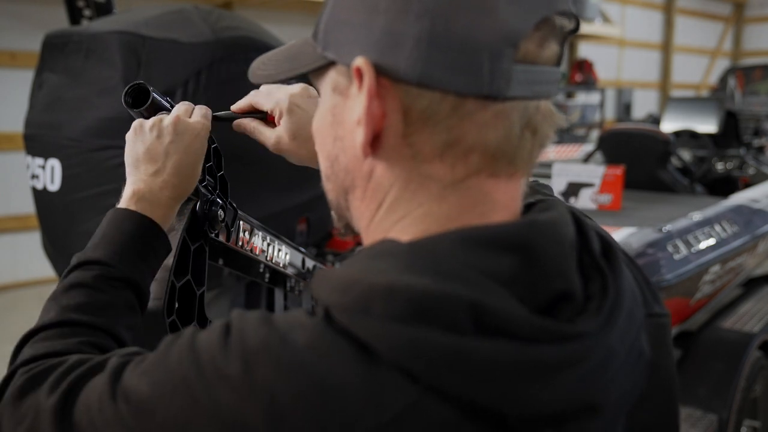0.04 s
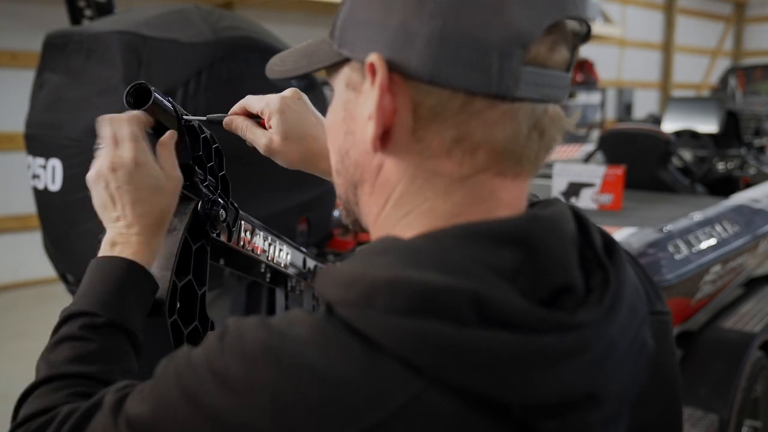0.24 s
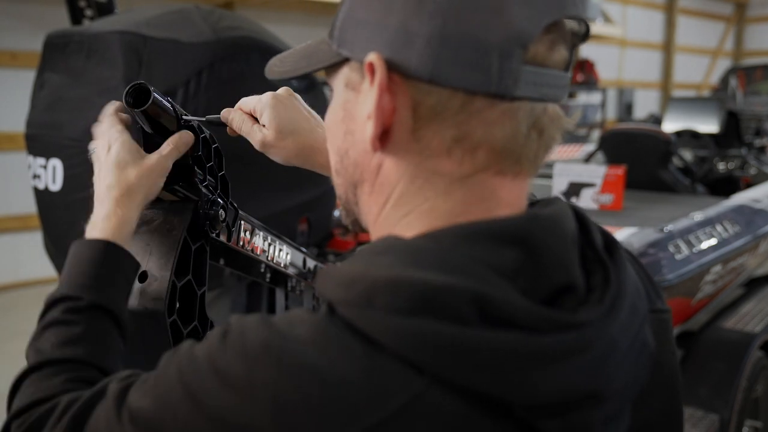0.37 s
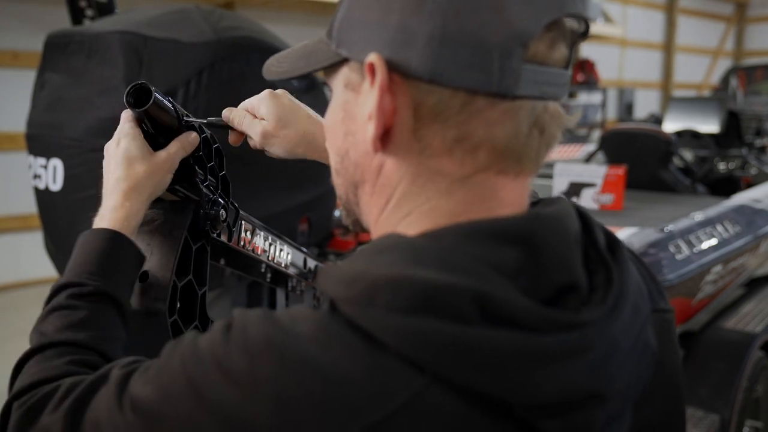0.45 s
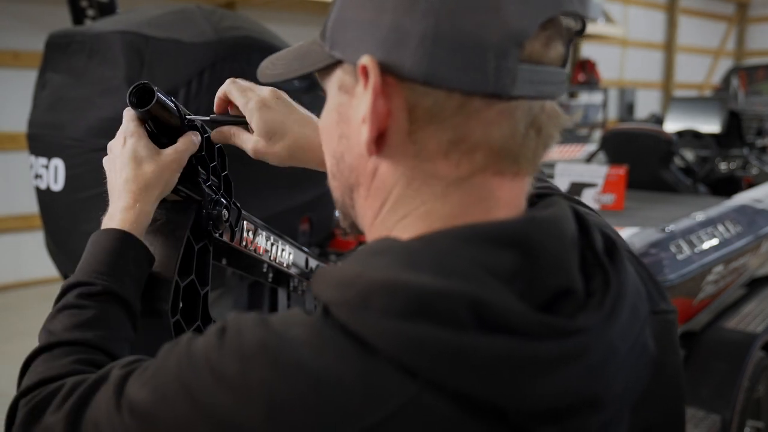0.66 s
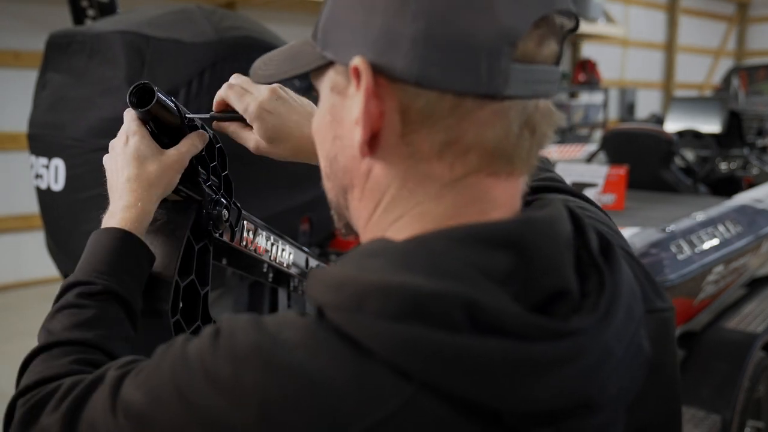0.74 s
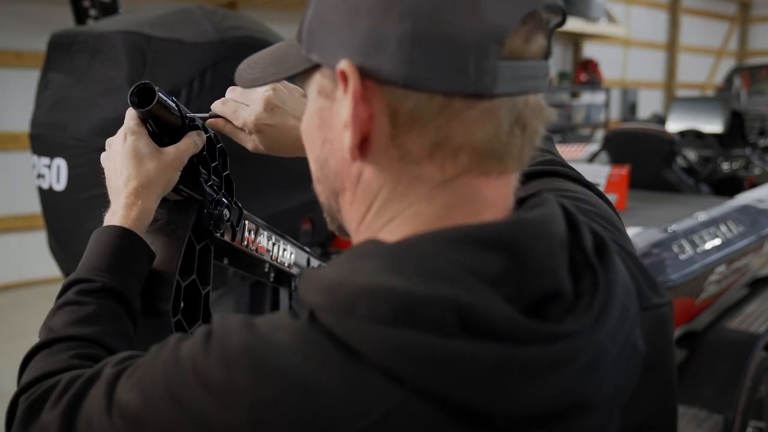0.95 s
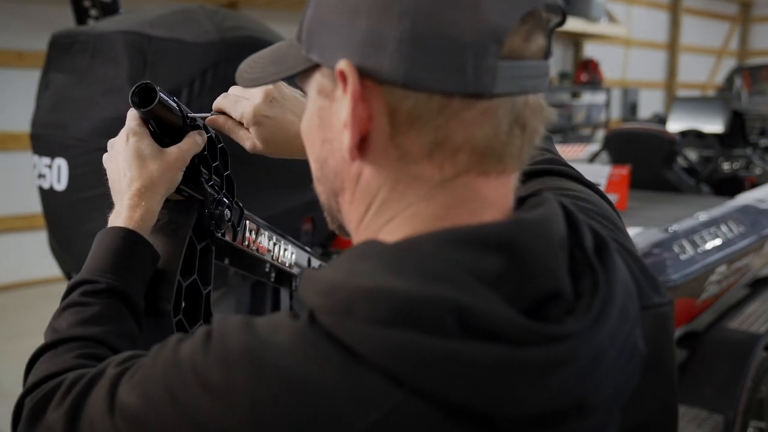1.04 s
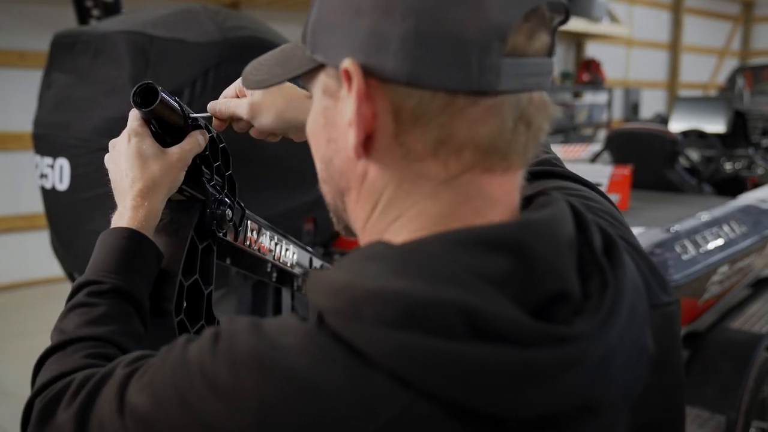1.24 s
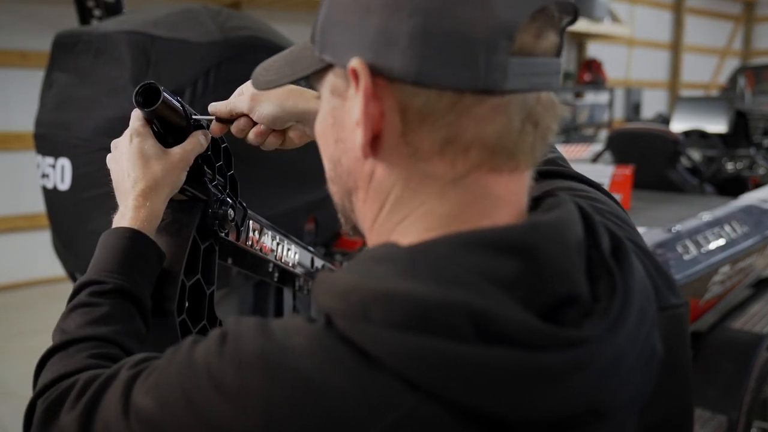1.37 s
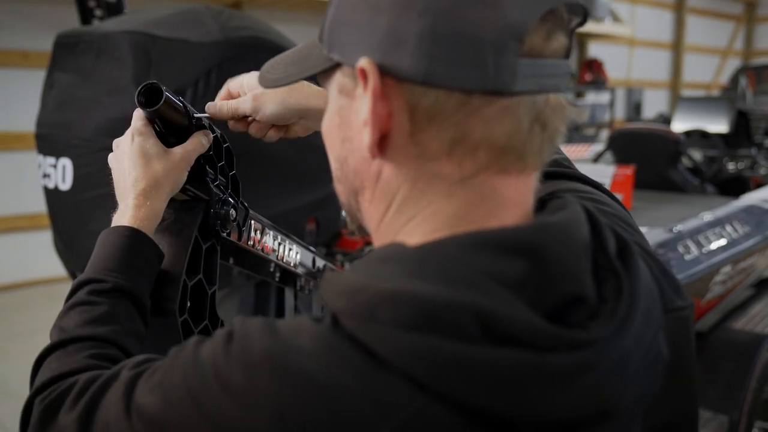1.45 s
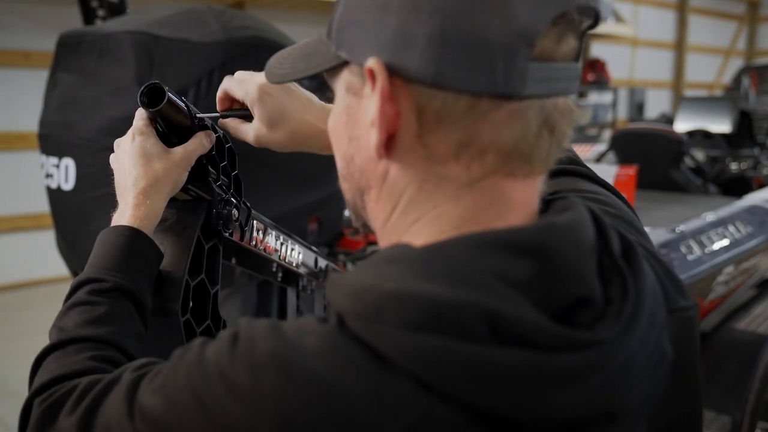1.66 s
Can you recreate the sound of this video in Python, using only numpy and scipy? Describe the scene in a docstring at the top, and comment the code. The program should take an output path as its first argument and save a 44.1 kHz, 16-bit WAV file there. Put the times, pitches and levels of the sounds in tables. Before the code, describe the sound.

A hand screwdriver clicks and slips on a small screw in a hollow tube, in a workshop

```python
"""Screwdriver on a hollow tube

A hand screwdriver works a small screw into a mount clamped on a hollow tube, in a big hard-walled workshop.
Knocks swell hollow sines, ring the upper tube modes and thud the frame; rubbing stirs further notes.
The steel tip ticks on the screw head by micro-touches and slips once in a short rattle of dense grains.
Decaying noise gives the hall's long faint tail; band-shaped noise gives a steady low rumble and hiss.
"""
import sys
import numpy as np
from scipy import signal
from scipy.io import wavfile

SR = 44100
rng = np.random.default_rng(int(sys.argv[2]) if len(sys.argv) > 2 else 0)


def linear_from_db(decibels):
    """Turn decibels (scalar or array-like) into linear amplitude factors; 0 gives 1."""
    return 10 ** (np.asarray(decibels, float) / 20)


def generate_wav(sig):
    """Save sig (samples, or channels by samples) to the path in sys.argv[1] as 16-bit PCM at SR."""
    pcm = np.round(np.clip(np.atleast_2d(sig).T, -1, 1) * 32767).astype(np.int16)
    wavfile.write(sys.argv[1], SR, pcm)


N = 74970

# workshop air, relative noise density: f/Hz, level/dB
AIR_SPECTRUM = [(13, -41), (22, -15.5), (80, 5), (200, -8.5), (256, -11.5), (387, -9), (420, -10),
                (602, -11.5), (710, -13), (1070, -14), (1410, -17), (2740, -30), (8490, -27.5),
                (12100, -30), (13900, -30.5), (16000, -43)]
AIR_RMS_DB = -61.5

# knocks on the tube, relative levels: t/s, level/dB, hollow f/Hz, second-note level/dB, upper-mode level/dB
TUBE_KNOCKS = [(.066, -32.5, 717, -34, -20), (.075, -25.5, 712, -9.5, -22.5),
               (.080, -34, 706.6, -2.5, -15.5), (.114, -41, 754, -7, -16.5), (.119, -40.5, 684, -15, -28),
               (.177, -32.5, 712, -19, -38), (.199, -35, 755, -10, -18), (.208, -23, 712, -10, -12),
               (.214, -21.5, 712, -6, -13), (.219, -24, 692, -7, -32), (.226, -26.5, 712, -6, -8.5),
               (.233, -36, 680, -5, -1.5), (.242, -42, 712, -18, -9.5), (.2515, -18.5, 740, -1, -6.5),
               (.256, -25, 712, -5.5, -10), (.262, -29, 712, -3, -8), (.269, -23, 703, -10, -8),
               (.275, -25.5, 742, 1.5, -4.5), (.280, -28.5, 780, 1, -9), (.287, -40.5, 790, -5, -7),
               (.339, -61, 780, 0, -0.5), (.416, -45.5, 780, -3, -17), (.422, -36.5, 766, -3.5, -17),
               (.430, -41.5, 722, -8, -18), (.451, -32.5, 694, -14, -11), (.455, -26.5, 718, -6, -13),
               (.460, -32.5, 747.2, -0.5, -15), (.467, -42, 673, -4.5, -2), (.482, -35.5, 654, -5.5, -15.5),
               (.489, -46, 715, -15, -15), (.502, -35, 693, -28, -21), (.522, -47.5, 706, -11, -13),
               (.558, -45, 802, -11, -0.5), (.562, -36, 654, -6, -11.5), (.583, -38.5, 643, -10, -15),
               (.622, -42, 715, -12, -17), (.656, -45.5, 690, -13, -13), (.668, -35, 780, -3.5, -7),
               (.673, -24, 698, -4.5, -13.5), (.682, -27.5, 670.6, -13, -16.5), (.687, -42, 687, -11, -8.5),
               (.710, -43, 674, -9, -15), (.717, -47.5, 706, -20, -25), (.742, -39, 718, -19, -32),
               (.757, -41, 681, -21.5, -31), (.809, -49, 734, -21.5, -30), (.822, -49.5, 690, -12, -22.5),
               (.886, -48, 692, -5, -9.5), (.907, -51.5, 680, 3.5, -8), (.941, -54.5, 773, 1.5, -2.5),
               (1.029, -49.5, 1240, -21, -16.5), (1.051, -40.5, 635, 0, -0.5),
               (1.058, -44.5, 611, -5, -7.5), (1.088, -49.5, 728, -16.5, -14),
               (1.275, -39.5, 684, -26, -12), (1.333, -49, 684, -16, -8.5), (1.375, -51, 707, -14, -13),
               (1.395, -52, 685, -4.5, -3.5), (1.409, -42, 657, -16, -10.5), (1.429, -37, 667, -14, -9.5),
               (1.449, -52.5, 787, -10, -7), (1.526, -56, 726, -20, -5), (1.575, -43.5, 647, -2, -7.5),
               (1.599, -51.5, 785, -17, -11), (1.618, -51, 675, -15, -14), (1.647, -51, 644, -23, -20.5)]
# upper tube modes: f/Hz, relative level/dB, t60/s
TUBE_UPPER_MODES = [(1124, 4.5, 0.01), (1421, 2.56, 0.021), (1642, -5.5, 0.023), (1925, 0.5, 0.015),
                    (2250, -4.5, 0.019), (2565, -10, 0.022), (3310, -8.0, 0.0064)]
# hollow notes stirred by rubbing: f/Hz, relative level/dB, t60/s
RUBBED_NOTES = [(657, 0, 0.057), (712, -4, .05), (780, -4.5, 0.12), (830, -5.5, 0.032), (830, -9.5, 0.019),
                (909, -2, 0.11)]
# handling, fingers and tool keep the tube faintly ringing: t/s, relative level/dB
HANDLING_LEVEL = [(0.0, -53.5), (0.126, -74), (0.278, -27.5), (0.358, -90), (0.62, -53.5), (0.814, -77),
                  (1.07, -63), (1.372, -71), (1.528, -66), (1.7, -60.5)]
# frame that holds the tube, dull thud: f/Hz, level/dB, t60/s
FRAME_MODES = [(167, -61, .15), (370.4, -59.5, 0.11)]
TUBE_CUT_HZ = 500  # the tube radiates little below its lowest note
SECOND_NOTE_HZ = 897
SWELL_S, LEAD_S = 0.0035, 0.00246  # onset to knock peak; contact ahead of the listed time
PUSH_S = 0.0041  # push on the frame, peaks at a third of this
KNOCK_CHATTER_S = 0.0015  # mean delay of a touch
LOW_DB, HIGH_DB, RUB_DB = -4, -9, -4.5
RUBS_PER_NOTE_PER_S, RUB_SPREAD_DB = 25, 0.73

# ticks of the tip on the screw: t/s, relative level/dB, brightest f/Hz, length/s, reach around it/octaves
TIP_TICKS = [(0.072, -47, 5700, 0.0025, 0.56), (0.132, -50, 9500, .0014, 0.4),
             (.148, -56.5, 9500, 0.0022, .4), (0.205, -29.5, 7500, 0.0018, 0.71),
             (.2105, -9, 11200, 0.0016, 0.3), (0.214, -7.5, 11000, 0.00038, 0.51),
             (0.2148, -7.5, 9700, 0.00061, 0.38), (0.2168, -24, 7950, 0.0013, .6),
             (0.2216, -8.5, 6600, 0.00082, 0.52), (0.2231, -12, 9600, 0.00043, 0.42),
             (0.231, -21.5, 6500, 0.0022, 0.38), (0.236, -21, 7260, 0.0026, 0.2),
             (0.252, -11, 8500, .0017, 0.75), (0.257, -25, 8100, 0.0006, .5),
             (0.259, -7.5, 8000, .0008, 0.47), (0.2628, -11, 9600, .0005, 0.34),
             (.266, -13, 11000, .0008, .5), (0.2673, -13, 8500, .0008, .5), (.272, -9, 8960, 0.00043, 0.49),
             (.453, -33, 8900, .002, 0.91), (.455, -28.5, 6950, .0015, 0.5), (0.476, -42, 8260, 0.0016, .4),
             (.4985, -40, 9500, 0.0017, 0.73), (0.56, -44, 4750, .002, 1), (0.581, -43, 5800, 0.0022, .4),
             (0.6, -53, 7000, .002, 0.42), (0.67, -33.5, 7200, 0.0041, 0.74),
             (0.673, -33, 7400, 0.0018, 0.67), (.677, -38.5, 4900, 0.0016, 0.4),
             (0.761, -51, 6000, 0.0021, 0.35), (.8834, -55.5, 5500, 0.00094, .6),
             (.902, -45, 7260, 0.0041, 0.14), (1.051, -41, 7350, 0.0023, 0.43),
             (1.089, -51, 8000, .002, 0.53), (1.273, -49.5, 4800, 0.0011, 0.74),
             (1.394, -39, 9000, 0.0023, 1), (1.419, -38, 7400, .005, 0.18),
             (1.4275, -38, 7320, 0.0014, 0.67), (1.5745, -47, 7340, .001, 0.39),
             (1.5882, -38.5, 11000, 0.0014, 0.68), (1.64, -52, 10000, .0006, .6)]
# modes of tip and screw: f/Hz, relative level/dB, t60 for ticks/s
STEEL_MODES = [(3160, -7.5, 0.00803), (4385, -27, 0.32), (4390, -7.5, 0.0043), (4900, -10.5, 0.0081),
               (5790, -6.5, 0.0048), (6600, -12, .009), (7320, -3.6, 0.005), (8500, -5, 0.0031),
               (9060, -10, 0.0043), (10130, -4, 0.0027), (11670, -16, .006), (13280, -8.5, 0.0028),
               (14300, -10, 0.0019), (15800, -9, 0.0026)]
# scraping tip in the slip: t/s, relative level/dB
SLIP_LEVEL = [(.2045, -49), (.207, -41), (.212, -31.5), (.222, -28.5), (.229, -43.5), (.234, -41),
              (.240, -26.5), (.247, -31), (.252, -36.5), (.260, -28.5), (.270, -40), (.276, -33.5),
              (.284, -52.5), (.295, -76)]
# gain in the slip of the modes above SLIP_TOP_HZ: t/s, level/dB
SLIP_TOP_LEVEL = [(.20, 3), (.228, 2.5), (.234, -9), (.246, -15), (.252, 0), (.29, -3)]
SLIP_TOP_HZ = 9000
TICK_DB, TOUCH_FADE_NEPERS_PER_LENGTH = -11.5, 0.43
SLIP_DB, SLIP_T60_RATIO = -5, 0.7
SLIP_GRAINS_PER_MODE_PER_S, GRAIN_SPREAD_DB = 1625, 3.5

# hall decay: f/Hz, t60/s
HALL_DECAY = [(200, 1.2), (800, 0.7), (2000, 0.46), (4500, 0.85), (9000, 0.47), (16000, 0.9)]
# hall colour: f/Hz, relative level/dB
HALL_TONE = [(200, 6.8), (260, -1.5), (430, 9), (800, -6.6), (1300, 5.5), (2500, -1), (3500, -0.5),
             (4400, -4), (6000, -21), (7500, -11), (10000, -15.5), (16000, -17)]
HALL_DB, HALL_GAP_S = -0.5, 0.005


def rms_one(x):
    """Scale to rms 1."""
    return x / np.sqrt(np.mean(x ** 2) + 1e-20)


def curve(rows, outside_db=None):
    """Level curve to gain per sample."""
    t_s, level_db = np.transpose(rows)
    return linear_from_db(np.interp(np.arange(N) / SR, t_s, level_db, left=outside_db, right=outside_db))


def at_hz(rows, hz):
    """Read a table on a log-frequency axis."""
    table_hz, values = np.transpose(rows)
    return np.interp(np.log(hz), np.log(table_hz), values)


def ring(clicks, hz, t60_s):
    """Two-pole resonator: a unit click starts a decaying sine of height 1."""
    r = linear_from_db(-60 / (t60_s * SR))
    w = 2 * np.pi * hz / SR
    return signal.lfilter([0, np.sin(w)], [1, -2 * r * np.cos(w), r * r], clicks + 1e-18)


def train(t_s, sizes):
    """Clicks of given sizes at given times."""
    return np.bincount((np.ravel(t_s) * SR).astype(int), np.ravel(sizes), N + SR)[:N]


def grains(per_s, spread_db):
    """Random clicks of uneven size and sign."""
    hits = rng.random(N) < per_s / SR
    sizes = linear_from_db(spread_db * np.minimum(rng.exponential(1, N), 4))
    return hits * sizes * rng.choice([-1, 1], N)


def shares(shape):
    """Random signed strengths of the touches of each blow, rms 1 per blow."""
    v = rng.normal(0, 1, shape)
    return v / np.sqrt(np.mean(v ** 2, axis=1, keepdims=True))


def bands():
    """Third-octave band filters with their centres."""
    edges_hz = 20 * 2 ** (np.arange(30) / 3)
    return [(np.sqrt(lo * hi), signal.butter(2, [lo, hi], "band", fs=SR, output="sos"))
            for lo, hi in zip(edges_hz, edges_hz[1:])]


def air():
    """Steady workshop rumble and hiss: white noise weighted by band."""
    white = rng.standard_normal((2, N + SR))
    noise = 0
    for k, (hz, sos) in enumerate(bands()):
        band = signal.sosfilt(sos, white[k % 2])[SR:]  # first second dropped: filters settle
        noise = noise + linear_from_db(at_hz(AIR_SPECTRUM, hz)) * band
    return linear_from_db(AIR_RMS_DB) * rms_one(noise)


def tube():
    """Knocks swell two hollow notes (grip sets the first), strike upper modes and frame; rubbing stirs notes."""
    t_s, level_db, pitch_hz, second_db, upper_db = np.transpose(TUBE_KNOCKS)
    t = np.arange(int(0.06 * SR)) / SR
    swell = t / SWELL_S * np.exp(1 - t / SWELL_S)
    low = np.zeros(N + SR)
    for k in range(len(t_s)):
        i = int((t_s[k] - LEAD_S) * SR)
        first = np.sin(2 * np.pi * pitch_hz[k] * t)
        second = linear_from_db(second_db[k]) * np.sin(2 * np.pi * SECOND_NOTE_HZ * t)
        low[i:i + len(t)] += linear_from_db(level_db[k] + LOW_DB) * swell * (first + second)

    rub = 0
    for hz, mode_db, t60_s in RUBBED_NOTES:
        rub = rub + linear_from_db(mode_db) * ring(grains(RUBS_PER_NOTE_PER_S, RUB_SPREAD_DB), hz, t60_s)
    rub = linear_from_db(RUB_DB) * curve(HANDLING_LEVEL) * rms_one(rub)

    chatter_s = KNOCK_CHATTER_S * rng.exponential(1, (len(t_s), 4))
    touches_s = t_s[:, None] - LEAD_S / 2 + chatter_s
    high = 0
    for hz, mode_db, t60_s in TUBE_UPPER_MODES:
        gain = linear_from_db(level_db + upper_db + mode_db + HIGH_DB)
        high = high + ring(train(touches_s, gain[:, None] * shares(touches_s.shape)), hz, t60_s)

    push_shape = t / PUSH_S * np.exp(1 - 3 * t / PUSH_S)
    push = np.convolve(train(t_s, linear_from_db(level_db)), push_shape)[:N]
    frame = sum(linear_from_db(mode_db) * ring(push, hz, t60_s) for hz, mode_db, t60_s in FRAME_MODES)
    high_pass = signal.butter(4, TUBE_CUT_HZ, "high", fs=SR, output="sos")
    return signal.sosfilt(high_pass, low[:N] + high + rub) + frame


def tip():
    """Each tick is eight micro-touches into the steel modes; the slip is a dense stream of grains."""
    t_s, level_db, bright_hz, length_s, reach_oct = np.transpose(TIP_TICKS)
    # delay in tick lengths; the first touch is on time
    delay = rng.exponential(1, (len(t_s), 8)) * (np.arange(8) > 0)
    touches_s = t_s[:, None] + length_s[:, None] * delay
    fade = np.exp(-TOUCH_FADE_NEPERS_PER_LENGTH * delay)  # later touches are weaker
    ticks, scrape = 0, 0
    for hz, mode_db, t60_s in STEEL_MODES:
        near = np.exp(-0.5 * (np.log2(hz / bright_hz) / reach_oct) ** 2)
        gain = linear_from_db(level_db + mode_db + TICK_DB) * near
        ticks = ticks + ring(train(touches_s, gain[:, None] * shares(touches_s.shape) * fade), hz, t60_s)

        top_gain = curve(SLIP_TOP_LEVEL) if hz > SLIP_TOP_HZ else 1
        stream = grains(SLIP_GRAINS_PER_MODE_PER_S, GRAIN_SPREAD_DB)
        scrape = scrape + linear_from_db(mode_db) * top_gain * ring(stream, hz, SLIP_T60_RATIO * t60_s)
    return ticks + linear_from_db(SLIP_DB) * curve(SLIP_LEVEL, -120) * rms_one(scrape)


def hall(x):
    """Diffuse tail: noise dying band by band, faded in over a short gap."""
    t = np.arange(int(1.2 * SR)) / SR
    white = rng.standard_normal((2, len(t)))
    tail = 0
    for k, (hz, sos) in enumerate(bands()):
        if hz > 150:
            decay_db = at_hz(HALL_TONE, hz) - 60 * t / at_hz(HALL_DECAY, hz)
            tail = tail + signal.sosfilt(sos, white[k % 2]) * linear_from_db(decay_db)
    tail = tail * (1 - np.exp(-(t / HALL_GAP_S) ** 2))
    return signal.fftconvolve(x, tail / np.sqrt(SR))[:N]


def scene():
    """Work at the tube, its tail in the hall, and the air; mono."""
    work = tube() + tip()
    return (work + linear_from_db(HALL_DB) * hall(work) + air())[None]


def top_cut(x):
    """Nothing passes above the cut-off."""
    return signal.sosfilt(signal.butter(12, 16670, fs=SR, output="sos"), x)


def record(dry):
    """Steep low-pass: 60 dB down from 17 kHz."""
    low_pass = signal.cheby2(10, 60, 17000, fs=SR, output="sos")
    mix = signal.sosfilt(low_pass, dry)
    return top_cut(mix)


dry = scene()
out = record(dry)
generate_wav(out)
```